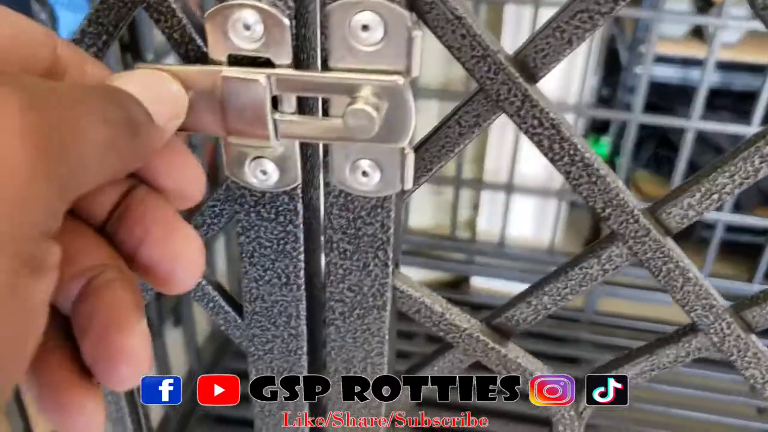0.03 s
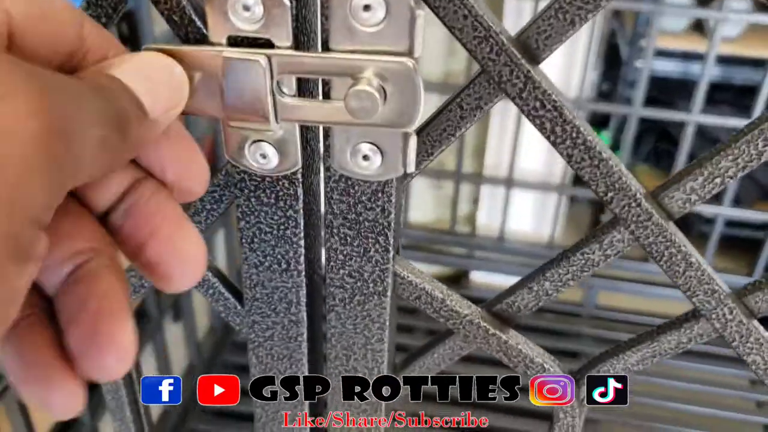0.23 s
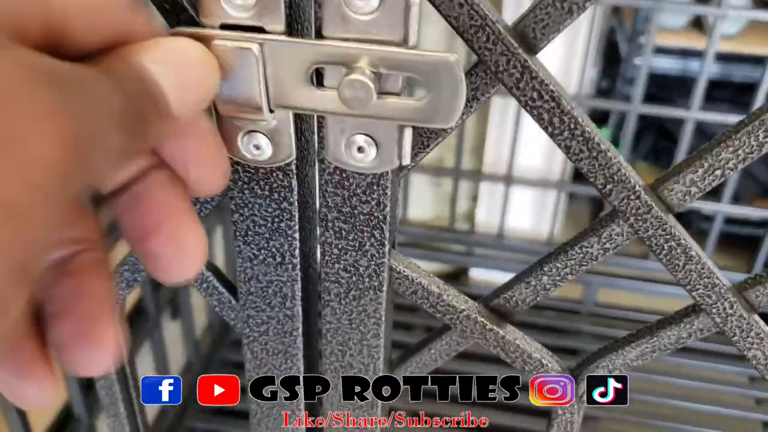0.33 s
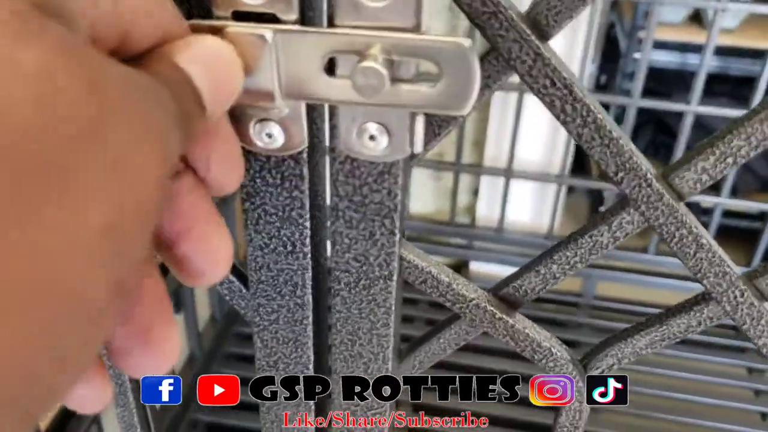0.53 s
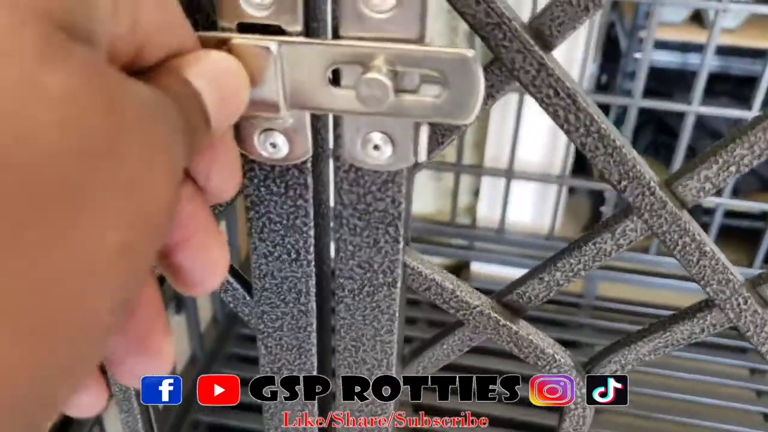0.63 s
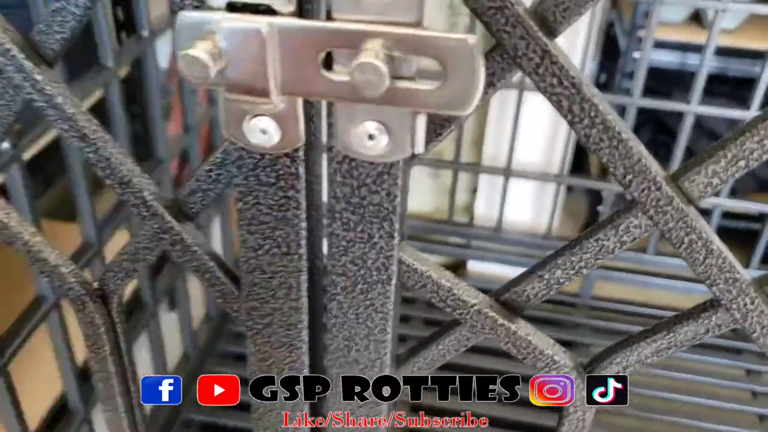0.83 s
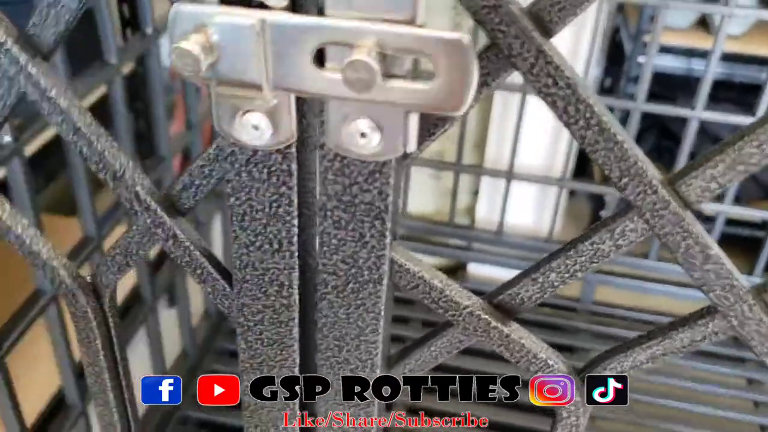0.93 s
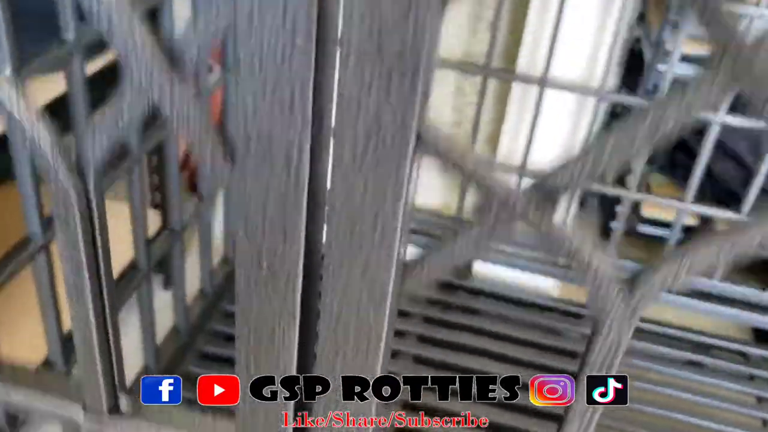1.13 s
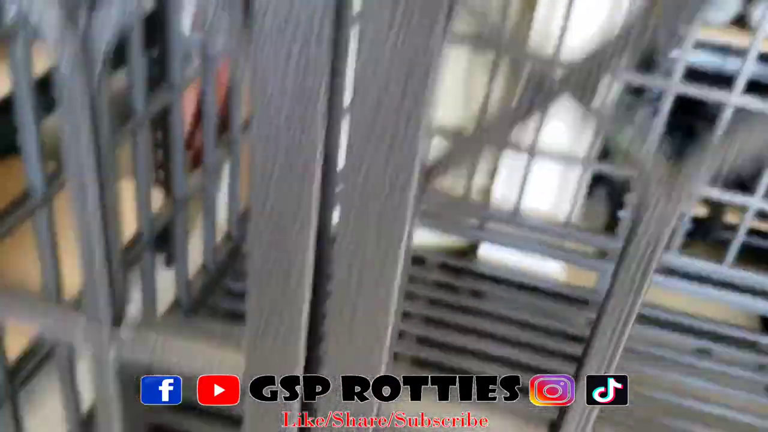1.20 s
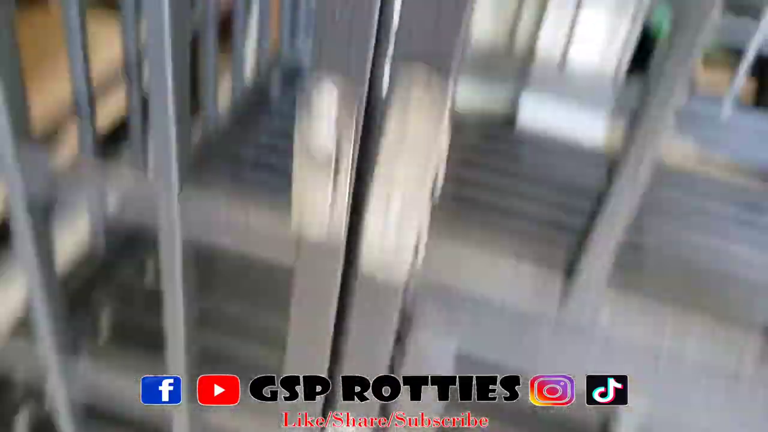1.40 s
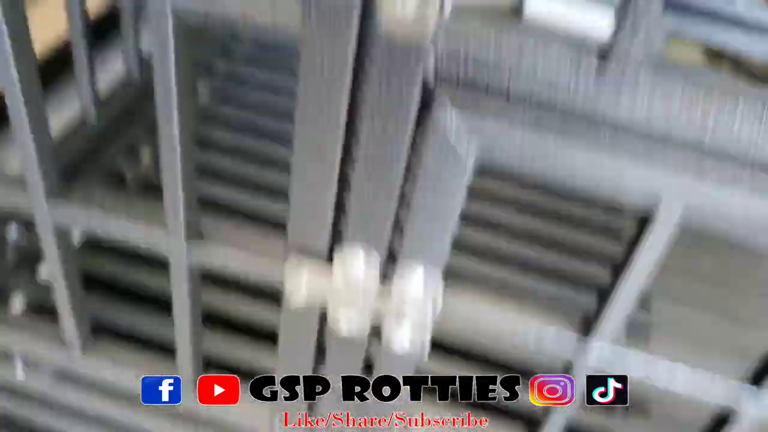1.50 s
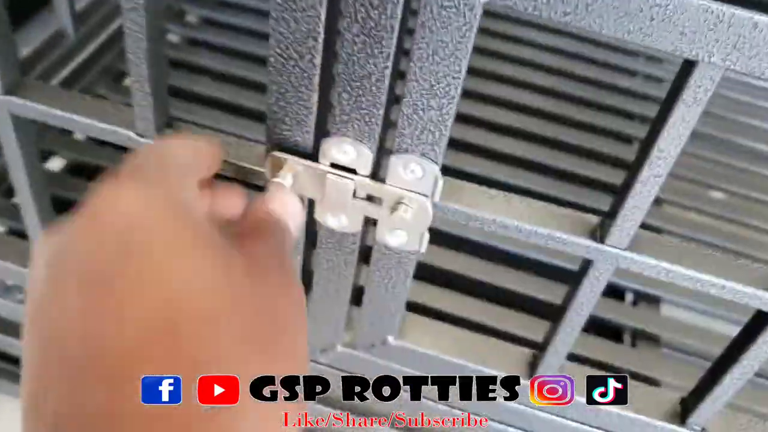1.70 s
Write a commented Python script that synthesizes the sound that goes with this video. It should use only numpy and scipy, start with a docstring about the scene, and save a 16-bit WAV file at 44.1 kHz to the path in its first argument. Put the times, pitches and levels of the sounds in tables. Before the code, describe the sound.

Close up in a garage, a metal bolt latch is worked by hand: a few clicks and short scrapes, one loud clack that rings the wire door, then fading ticks and a light tap over faint room rumble.

```python
"""Slide bolt on a wire crate

A garage, a spaced pair close to the latch. Worked by hand, the steel bolt scrapes in its guide and
clacks against its stops, ringing the latch plate and the grid door; the crate shudders at each push.
The freed door ticks faintly, fingers brush metal and the microphone housing, and something taps
lightly beside the microphone. Low room rumble and hiss lie underneath."""
import sys
import numpy as np
from scipy import signal
from scipy.fft import rfft, irfft, next_fast_len
from scipy.io import wavfile

SR = 44100
rng = np.random.default_rng(int(sys.argv[2]) if len(sys.argv) > 2 else 0)


def bounce(signal):
    """Save signal as a 16-bit WAV file at the path given by the first command-line argument."""
    frames = np.transpose(np.atleast_2d(signal))
    limited = np.clip(frames, -1, 1)
    pcm = np.round(limited * 32767).astype(np.int16)
    wavfile.write(sys.argv[1], SR, pcm)


N = 77175

# long-ringing modes of the grid door: f/Hz, level/dB, t60/s
DOOR_MODES = [(354, -8, .45), (596.6, -10, 0.42), (948, -6, .3), (1113, -6, .5), (2152, -6.5, 0.25),
              (3064, -5.5, .35), (3596, -1.5, 0.19), (3784, -6, .6), (3915, -4, .7), (4160, -9, 0.49),
              (4854, -4, .5)]
DOOR_MODES_DB = -30.5
BRIEF_CONTACT_T60_S = 0.01  # one slip or rebound of the bolt


def amp(db):
    """Decibels to gain."""
    return 10 ** (np.asarray(db) / 20)


def along(points, hz):
    """Read a curve of (f/Hz, value) points on a log frequency axis."""
    f, values = np.transpose(points)
    return np.interp(np.log(hz + 1), np.log(f + 1), values)


def filtered(x, response):
    """Shape x by a gain that depends on frequency."""
    n = x.shape[-1]
    padded = next_fast_len(n + 8192)
    return irfft(rfft(x, padded) * response(np.fft.rfftfreq(padded, 1 / SR)), padded)[..., :n]


def noise(colour, n, tilt_db=0):
    """Unrelated left and right noise of joint rms 1, coloured, and tilted per octave above 500 Hz."""
    gain = lambda hz: amp(along(colour, hz) + tilt_db * np.log2(np.maximum(hz, 500) / 5000))
    x = filtered(rng.standard_normal((2, n)), gain)
    return x / np.sqrt(np.mean(x ** 2) + 1e-20)


def fade(x, t60s):
    """Let each frequency of x die at its own speed."""
    hz, t, spectra = signal.stft(x, SR, nperseg=256)
    decay = amp(-60 * t / along(t60s, hz)[:, None])
    return signal.istft(spectra * decay, SR, nperseg=256)[1][:, :x.shape[1]]


def pan(db):
    """Left and right gains, the left louder by db."""
    return amp(np.array([[db], [-db]]) / 2)


def add(out, s, x):
    """Mix x into out from s seconds, dropping what falls outside."""
    start = round(s * SR)
    x, start = x[:, max(-start, 0):], max(start, 0)
    out[:, start:start + x.shape[1]] += x[:, :N - start]


def ring(modes, t):
    """Damped modes, struck a little differently each time and heard differently at each microphone."""
    hz, db, t60 = np.transpose(modes)
    strength = amp(db + rng.normal(0, 1.5, (2, len(modes))))
    phase = np.exp(2j * np.pi * rng.random((2, len(modes))))
    ringing = np.exp(np.outer(2j * np.pi * hz - np.log(1000) / t60, t))
    return ((strength * phase) @ ringing).real


def garage(x, room_db):
    """The close sound plus the answer of the hard walls, turned up or down by room_db."""
    # decay of the room: f/Hz, t60/s
    room_t60 = [(100, 0.46), (500, 0.65), (2000, 0.43), (4200, 0.42), (8000, 0.36), (12000, .42),
                (15000, .3)]
    # colour of the reverberation: f/Hz, level/dB
    room_colour = [(100, 10.5), (300, -0.5), (1000, 2), (2500, 5.5), (5000, -1.5), (8000, -5.5),
                   (15000, -8.5)]
    t = np.arange(SR) / SR
    build_up = 1 - np.exp(-(t / .007) ** 2)
    tail = fade(rng.standard_normal((2, SR)), room_t60) * build_up
    tail = filtered(tail / np.linalg.norm(tail[0]), lambda hz: amp(along(room_colour, hz)))
    return x + amp(room_db - 7.5) * signal.fftconvolve(x, tail, axes=1)[:, :x.shape[1]]


def room_tone():
    """Steady low rumble, nearly alike left and right, under a wide, faint hiss."""
    # spectrum of the rumble: f/Hz, level/dB
    rumble_colour = [(20, -14), (40, -11), (62, -8), (80, 1), (102, -11.5), (135, -14.5), (190, -23.5),
                     (300, -26), (600, -59)]
    # spectrum of the hiss: f/Hz, level/dB
    hiss_colour = [(100, 0), (400, -3), (750, 3), (1200, -9.5), (3000, -11), (4500, -7.5), (6200, -10),
                   (8500, -21), (12500, -15), (15500, -16)]
    mid, side = amp(-70) * noise(rumble_colour, N)
    return mid + amp(-11.5) * np.array([side, -side]) + amp(-77) * noise(hiss_colour, N)


def bolt_clacks():
    """The bolt hits its guide or a stop and rebounds once; plate, wires and grid ring on."""
    # blows: t/s, level/dB, treble tilt/(dB/octave), left-right/dB, door ring/dB, room/dB
    blows = [(-.1, -35, -2, 0, -1, 1.5), (.008, -35.5, 1, 0.5, 4.5, 2.5), (0.037, -35.5, 2, -2.5, 1.5, -8),
             (.166, -44, -1.5, -3, -0.5, -1.5), (.1755, -47, 3, 0.5, -4, -4), (.1965, -24, -.3, -1, -1, -2),
             (0.387, -25, 2, 1.5, -3, -5.5), (0.3983, -10, 2.5, 1.5, -1.5, -4.5),
             (0.5379, -30.5, 1, -1, 1, -3)]
    # dense steel ring of the contact: f/Hz, level/dB
    steel_colour = [(100, -29.5), (300, -18.5), (800, -12.5), (1300, -12), (2000, -6), (3800, -11),
                    (5300, 6.5), (6800, -0.5), (8800, -13), (11500, -2.5), (13000, -7.5), (14500, 2),
                    (16000, -8.5)]
    # modes of the latch plate: f/Hz, level/dB, t60/s
    plate_modes = [(3203, -11, .2), (3252, -8, .2), (4913, -4, .21), (5001, -2, .17), (5049, -3, .15),
                   (5366, -6, .12), (5453, 0, .17), (5712, -8, .2), (6254, -4, .14), (6412, -7, .18),
                   (7174, -6, .15), (9402, -9, .16), (13835, -7, .12), (14654, -1, .11)]
    # dense ring of the wires: f/Hz, level/dB
    wire_colour = [(100, -18.5), (260, -12), (450, -11.5), (700, -9.5), (1200, -6.5), (2000, -3),
                   (3800, -2), (5300, 1), (6800, -1.5), (8500, -6), (12000, -5.5), (14500, -6),
                   (16000, -11)]
    # decay of the wires: f/Hz, t60/s
    wire_t60 = [(300, 0.43), (2000, 0.23), (6000, .21), (15000, 0.14)]
    attack_s, contact_t60_s, rebound_s = .0003, 0.057, 0.0031
    out, t = np.zeros((2, N)), np.arange(SR) / SR
    rebound = amp(-4 - 60 * np.abs(t - rebound_s) / BRIEF_CONTACT_T60_S) * (t > rebound_s)
    contact = amp(-60 * t / contact_t60_s) + rebound
    for s, db, tilt_db, pan_db, door_db, room_db in blows:
        steel = contact * noise(steel_colour, SR, tilt_db) + amp(-13.5) * ring(plate_modes, t)
        wires = amp(-4.5) * fade(noise(wire_colour, SR, tilt_db), wire_t60)
        door = wires + amp(DOOR_MODES_DB) * ring(DOOR_MODES, t)
        blow = (steel + amp(door_db) * door) * (1 - np.exp(-t / attack_s))
        add(out, s, amp(db) * pan(pan_db) * garage(blow, room_db))
    return out


def bolt_scrapes():
    """Steel sticks and slips on steel: irregular tiny contacts, each with a short ring."""
    # strokes of the bolt: t/s, length/s, end level/dB, swell over the stroke/dB
    strokes = [(.004, 0.055, -46, -5), (0.173, .024, -52, -0.5), (0.364, .015, -50, 10),
               (0.379, 0.017, -28.5, 5)]
    # spectrum of one slip: f/Hz, level/dB
    slip_colour = [(100, -23), (400, -15.5), (800, -8.5), (1500, -10), (3800, -1.5), (5100, 5),
                   (6800, -3.5), (8800, -12), (11500, -5.5), (13000, -10.5), (14500, -5.5), (16000, -9.5)]
    slips_per_s, scatter_db = 970, 3.5
    out, t = np.zeros((2, N)), np.arange(SR) / SR
    for s, length, db, swell_db in strokes:
        when = np.cumsum(rng.uniform(.2, 1.8, 256)) / slips_per_s
        ramp_db = swell_db * (np.minimum(when / length, 1) - 1)
        strength = amp(ramp_db + rng.normal(0, scatter_db, len(when))) * (when < length)
        impulses = np.bincount((when * SR).astype(int), strength, SR)[:SR]
        slip = noise(slip_colour, SR) * amp(-60 * t / BRIEF_CONTACT_T60_S)
        slip = slip / np.linalg.norm(slip, axis=1, keepdims=True) * np.sqrt(SR / slips_per_s)
        add(out, s, amp(db) * signal.fftconvolve(impulses[None], slip, axes=1)[:, :SR])
    return garage(out, room_db=0)


def crate_thuds():
    """The whole crate shudders briefly under each push."""
    # the hand jostling the door: t/s, level/dB
    pushes = [(.008, -59), (0.149, -55.5), (.195, -59.5), (0.266, -56), (.41, -62), (.555, -54.5),
              (.785, -67.5), (.975, -73)]
    # spectrum of the shudder: f/Hz, level/dB
    thud_colour = [(25, -13), (80, -1), (110, -2.5), (145, 1.5), (210, -15), (500, -34)]
    attack_s, t60_s = .006, .3
    out, t = np.zeros((2, N)), np.arange(SR) / SR
    envelope = amp(-60 * t / t60_s) * (1 - np.exp(-t / attack_s))
    for s, db in pushes:
        add(out, s, amp(db) * envelope * noise(thud_colour, SR))
    return out


def door_ticks():
    """The loose door touches its frame, softer and duller than the bolt, and the grid rings."""
    # touches: t/s, level/dB, treble tilt/(dB/octave), left-right/dB, door ring/dB, room/dB
    touches = [(.574, -41, 0.5, -3, -6, -4), (0.742, -48, 0.5, -2, 12.5, 2),
               (.758, -52.5, 1, 2.5, 7.5, 7.5), (0.8323, -48.5, 1, 0.5, -11, 6.5),
               (.862, -59, -4.5, -4, -11, 0), (0.9864, -55, 2, -2, -1, 8), (1.018, -61, -1.5, 4, 7, 9),
               (1.075, -67.5, -0.5, -3, 0, -10), (1.583, -73.5, -2.5, -6.5, -9.5, 1)]
    # dense steel ring of a tick: f/Hz, level/dB
    tick_colour = [(100, -25), (600, -12), (1500, -11), (3000, -12.5), (4200, -2), (6300, -4.5),
                   (8000, -20), (11000, -24), (15000, -33)]
    attack_s, t60_s = .001, 0.1
    out, t = np.zeros((2, N)), np.arange(SR * 2 // 3) / SR
    for s, db, tilt_db, pan_db, door_db, room_db in touches:
        contact = noise(tick_colour, len(t), tilt_db) * amp(-60 * t / t60_s)
        door = amp(DOOR_MODES_DB + door_db) * ring(DOOR_MODES, t)
        tick = (contact + door) * (1 - np.exp(-t / attack_s))
        add(out, s, amp(db) * pan(pan_db) * garage(tick, room_db))
    return out


def finger_brushes():
    """Soft swells of skin friction on metal and on the microphone housing."""
    # brushes: middle t/s, half length/s, level/dB, left-right/dB, treble tilt/(dB/octave)
    brushes = [(.81, 0.04, -68, 2.5, 2.5), (0.871, 0.051, -70, 0, -0.5), (.95, 0.036, -73, -1, 0),
               (1.021, .025, -70, -3, 3), (1.645, 0.12, -80, -2.5, 0.5), (1.675, 0.017, -67, -2.5, -2.5),
               (1.7, .05, -77.5, -6, -4.5)]
    # spectrum of rubbing skin: f/Hz, level/dB
    skin_colour = [(200, -15), (1200, -24), (2300, 0), (3300, -7.5), (5300, -1), (7500, -15.5),
                   (11000, -8.5), (15000, -11.5)]
    out, t = np.zeros((2, N)), np.arange(N) / SR
    for s, half_length, db, pan_db, tilt_db in brushes:
        swell = np.exp(-((t - s) / half_length) ** 2)
        out += amp(db) * pan(pan_db) * swell * noise(skin_colour, N, tilt_db)
    return out


def near_taps():
    """Light taps by the right microphone: two quickly damped modes, too near to wake the room."""
    # taps: t/s, level/dB, f/Hz
    taps = [(1.661, -65.5, 2410), (1.6741, -52, 2110)]
    # modes of a tap: multiple of its pitch, level/dB
    tap_modes = [(1, 2), (2.55, -7.5)]
    attack_s, t60_s = 0.00042, 0.017
    out, t = np.zeros((2, N)), np.arange(SR // 2) / SR
    envelope = amp(-60 * t / t60_s) * (1 - np.exp(-t / attack_s))
    for s, db, hz in taps:
        tone = sum(amp(mode_db) * np.sin(2 * np.pi * hz * ratio * t) for ratio, mode_db in tap_modes)
        add(out, s, amp(db) * pan(db=-12.5) * envelope * tone)
    return out


def spaced_pair(x):
    """Long waves reach both microphones alike, short ones do not."""
    # likeness of left and right: f/Hz, correlation
    likeness = [(100, 0.96), (250, 0.54), (500, .6), (800, .1), (1200, -.3), (2200, -.1), (4000, 0)]
    angle = lambda hz: np.arcsin(np.clip(along(likeness, hz), -1, 1)) / 2
    own_side = filtered(x, lambda hz: np.cos(angle(hz)))
    crossfeed = filtered(x[::-1], lambda hz: np.sin(angle(hz)))
    return own_side + crossfeed


def scene():
    """Latch and door close up, with small handling sounds, over the quiet garage."""
    crate = bolt_clacks() + bolt_scrapes() + door_ticks() + crate_thuds()
    return spaced_pair(crate) + near_taps() + finger_brushes() + room_tone()


def record(dry):
    """The two microphones differ in colour and cut off steeply at the top of the band."""
    # balance of the pair: f/Hz, left-right/dB
    balance = [(100, 0), (650, -1.5), (1100, -3), (2500, -3.5), (4500, -6.5), (8000, 2.5), (11500, -2),
               (14500, 7.5)]
    top_hz = 15900
    sides = np.array([[1], [-1]])
    band_limit = lambda hz: 1 / np.sqrt(1 + (hz / top_hz) ** 160)
    return filtered(dry, lambda hz: amp(along(balance, hz) * sides / 2) * band_limit(hz))


dry = scene()
out = record(dry)
bounce(out)
```